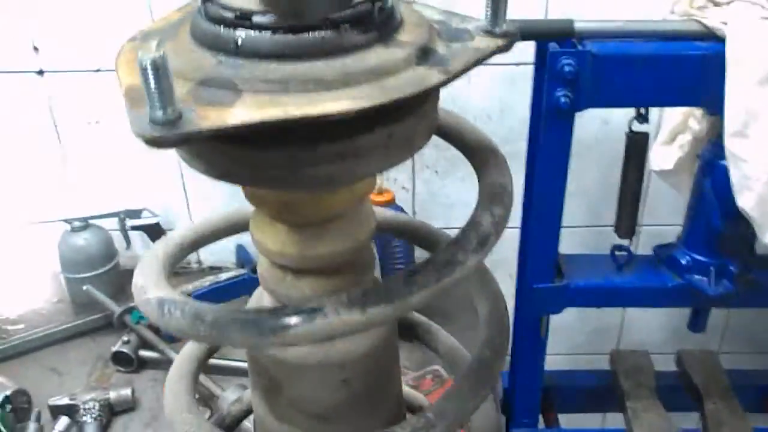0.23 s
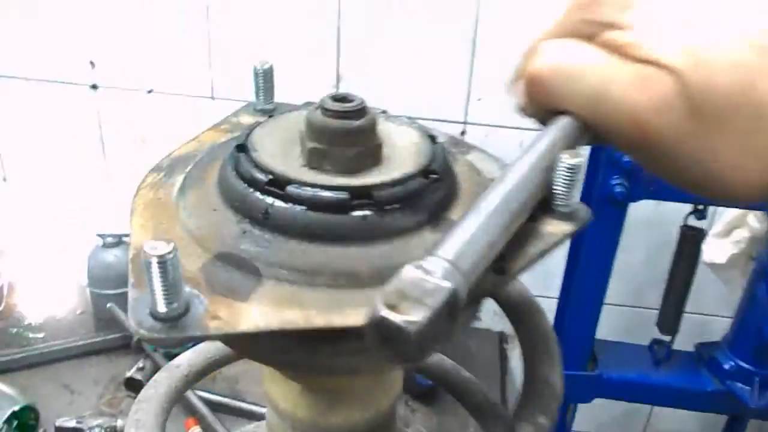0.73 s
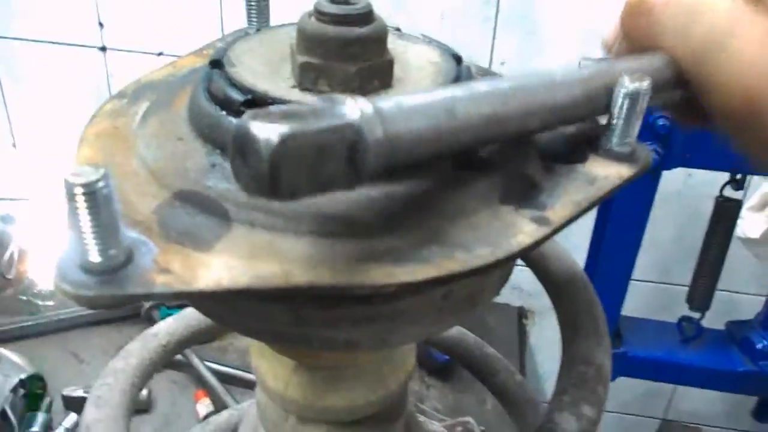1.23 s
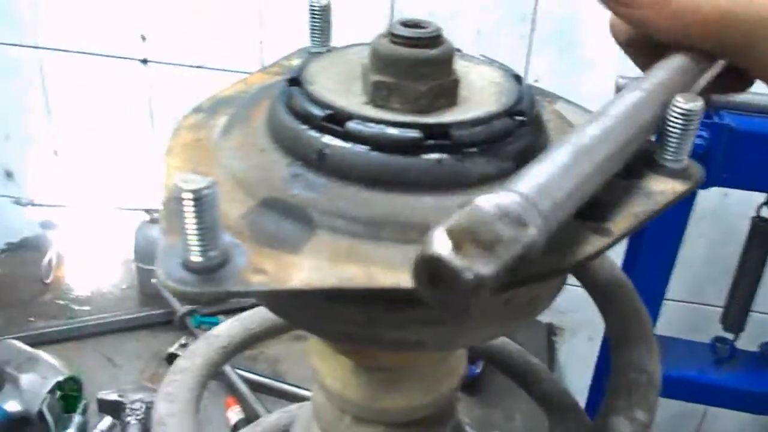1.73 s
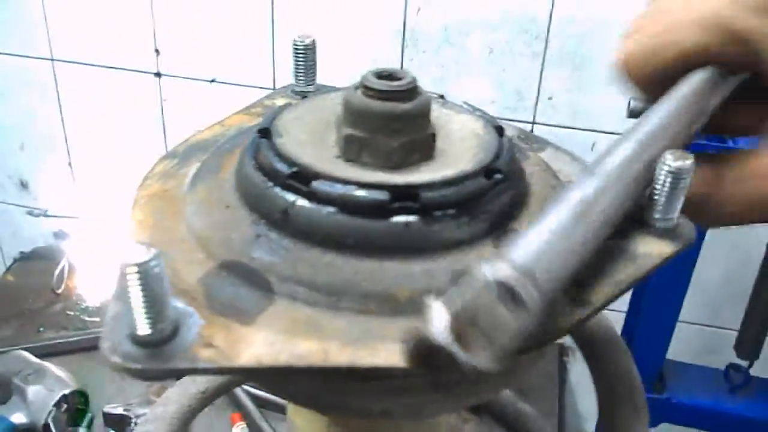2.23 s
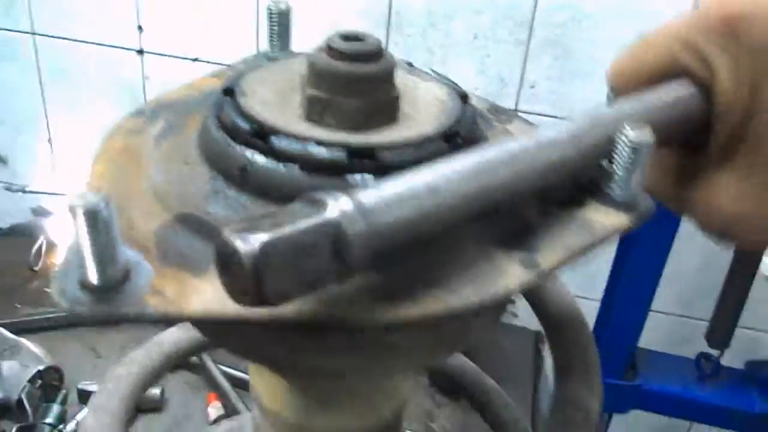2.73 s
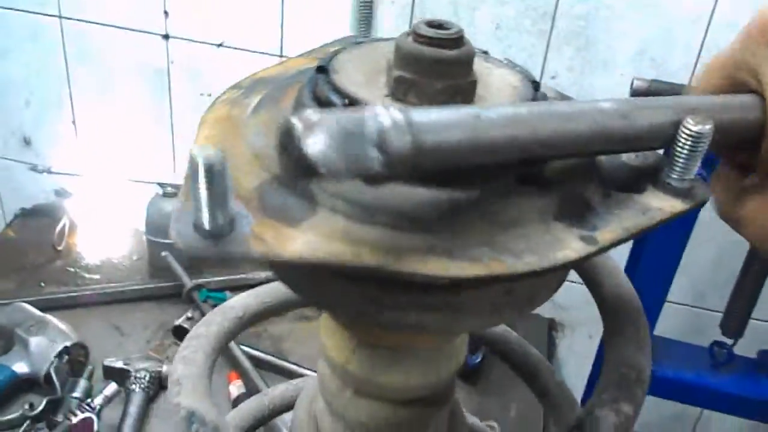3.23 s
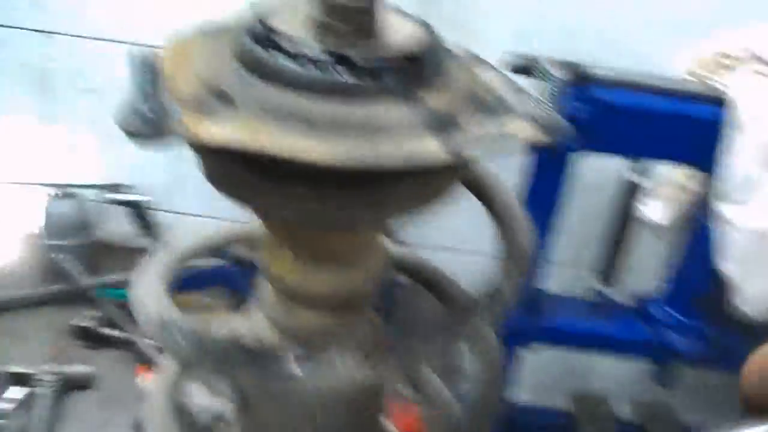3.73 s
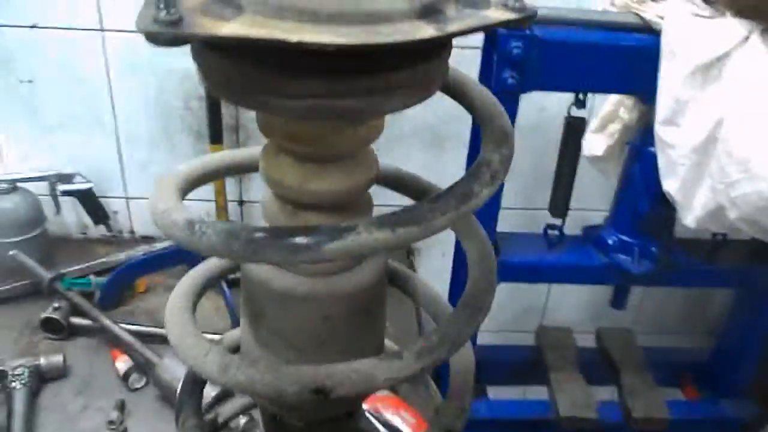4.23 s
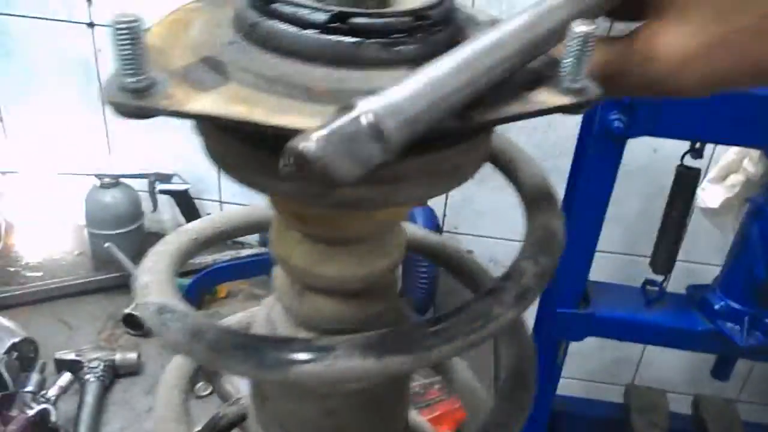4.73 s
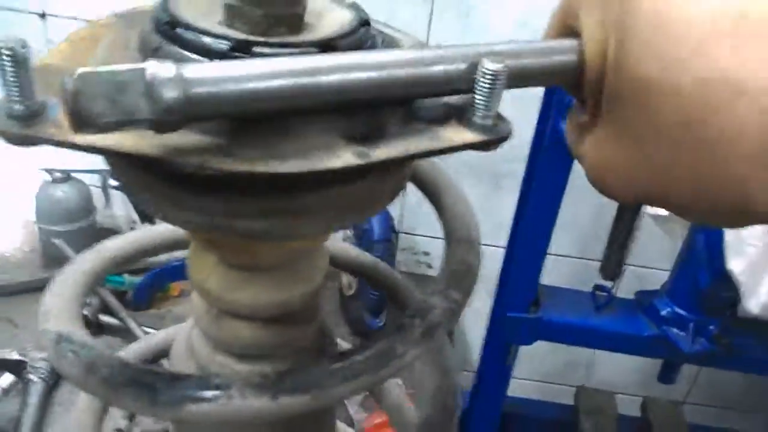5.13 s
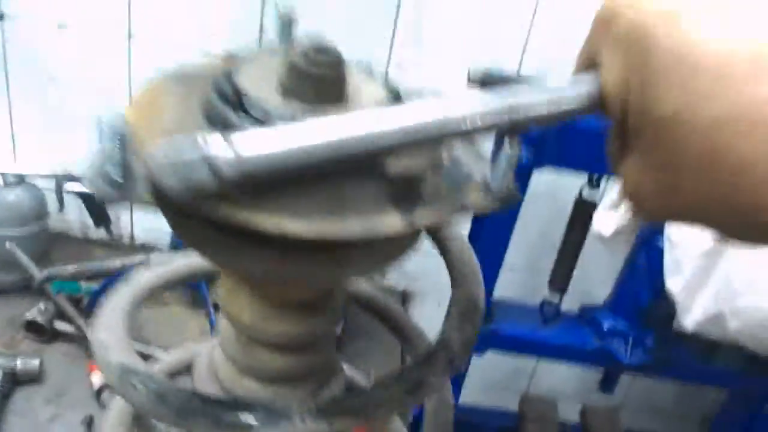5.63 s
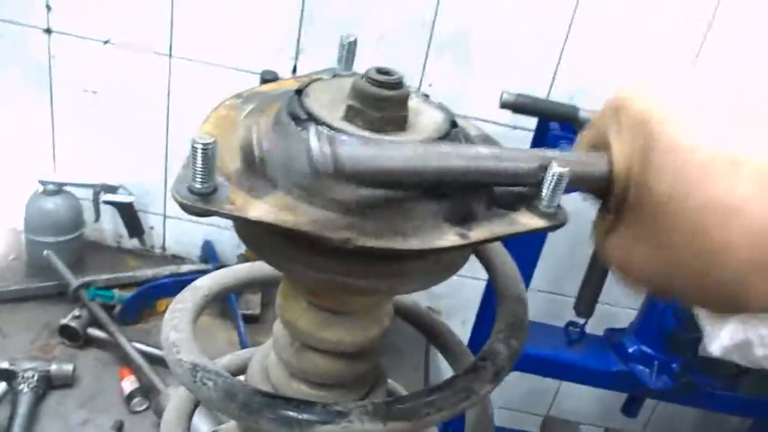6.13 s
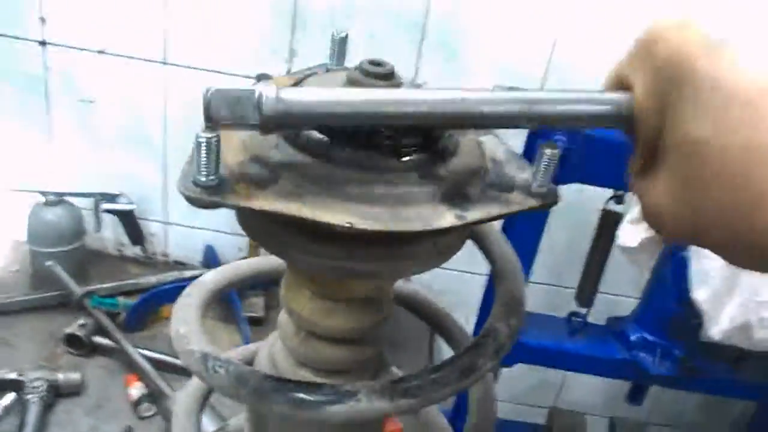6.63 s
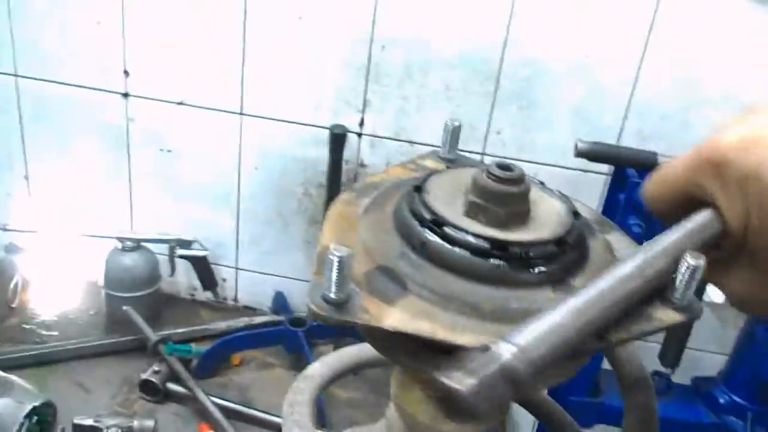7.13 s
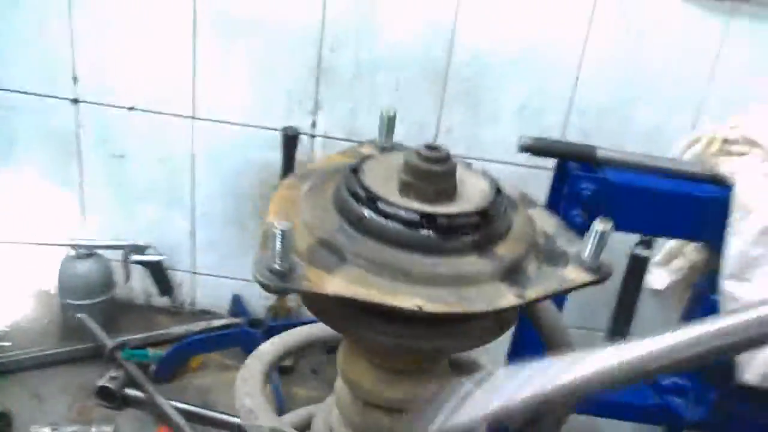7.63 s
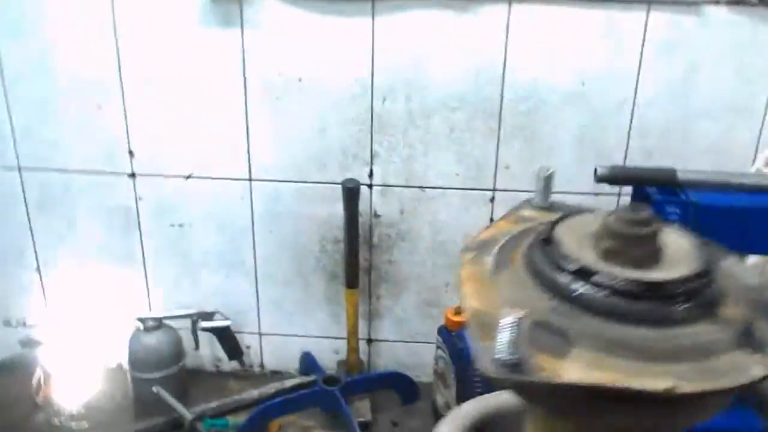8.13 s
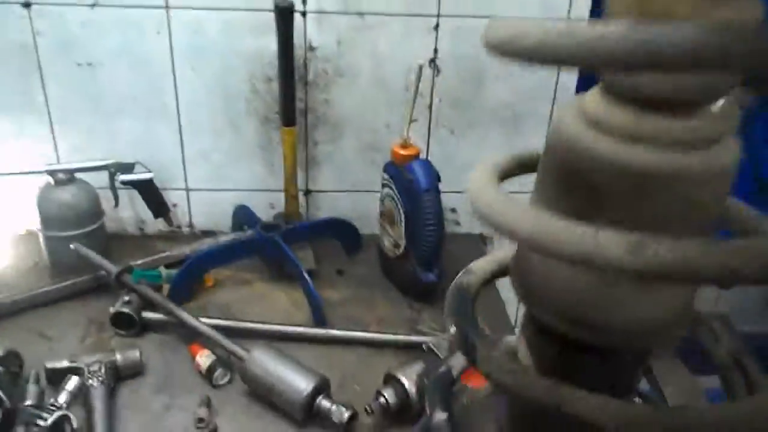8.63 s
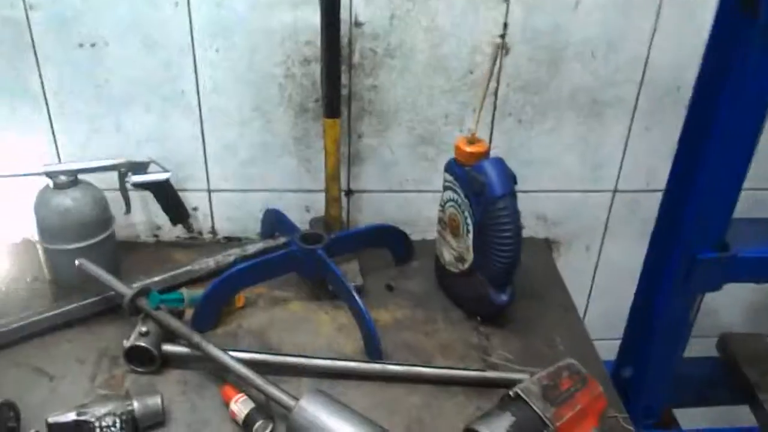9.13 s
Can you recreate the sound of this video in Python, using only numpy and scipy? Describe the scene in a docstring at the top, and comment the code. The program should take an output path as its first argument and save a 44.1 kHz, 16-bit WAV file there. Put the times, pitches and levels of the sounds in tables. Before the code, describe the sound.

Faint hiss, light rubbing and low bench rumble open the scene, close to a band-limited phone microphone in a tiled workshop. At 0.55 s a hard bright steel crack lands, followed by small ticks and dry scraping. Sparse clicks around 1.5-1.8 s are softer; a tight cluster snaps at 2.3-2.55, with another crack at 2.76. At 3.3 a rapid slowing chatter of thread clicks runs into loud cracks at 3.6-3.8 and a harsh rubbing swell with hollow ringing near 3.9. After a lull, cracks and duller clunks return irregularly from 4.5 to 5.8, then again at 6.65-7.15, with creaky rubs between. A dense clipped burst at 7.5-7.6 brings a second ringing swell, fading by 8.3. Soft knocks at 8.7-8.8 precede sharp knocks at 9.16 and 9.35-9.4, with scraping and a small tool's thin high ping.

```python
"""Low bench rumble, hiss and rubbing steel, then sharp clicks: a steel bar wedged between the studs of a
strut mount twists it to and fro in a tiled workshop. Clicks are noise bursts through resonances, the walls
decaying noise; rubs, swelling tails and bench are patchy noise through modes; a small tool rings as a sine.
One narrow-band phone microphone ducks after loud moments and clips."""
import sys
import numpy as np
from scipy import signal
from scipy.fft import rfft, irfft, next_fast_len
from scipy.io import wavfile
from scipy.ndimage import uniform_filter1d, map_coordinates

SR = 44100
rng = np.random.default_rng(int(sys.argv[2]) if len(sys.argv) > 2 else 0)


def pcm_store(signal):
    """Save signal as 16-bit PCM."""
    levels = np.round(np.clip(np.atleast_2d(signal), -1, 1) * 32767)
    wavfile.write(sys.argv[1], SR, levels.astype(np.int16).T)


N = 414540
STEP = 64  # samples between control values

# steel contacts: start_s, level_db, centre_hz, plate_db (levels before the trims in clicks())
CONTACTS = [(0.552, 2.5, 6250, -18), (0.592, -8, 5930, -11.5), (0.614, -13.5, 5620, -11.5),
            (0.7564, -27, 6550, -1.5), (1.0012, -20.5, 5220, -15), (1.518, -24.5, 4600, -12),
            (1.5355, -7, 5690, -20), (1.6487, -17.5, 6400, -27.5), (1.736, -23.5, 4600, -20.5),
            (1.7505, -18.5, 6170, -25.5), (1.769, -20.5, 5560, -19), (2.304, -24, 6240, -26),
            (2.318, -27, 6450, -25.5), (2.351, -23.5, 5000, -24), (2.368, -24.5, 5470, -24.5),
            (2.388, -1.5, 6050, -12.5), (2.487, -10, 6120, -6), (2.504, -2.5, 5620, -25),
            (2.5143, 1, 6100, -37), (2.523, -8, 6260, -30.5), (2.5558, -14, 6100, -9),
            (2.7572, -0.5, 5500, -12), (2.8779, -12.5, 5120, -18.5), (2.939, -26, 5870, -20.5),
            (2.994, -28.5, 5950, -21), (3.58, 2, 4600, -22.5), (3.6057, 0, 6020, -31.5),
            (3.6125, -1, 6520, -19), (3.6202, 6.5, 6200, -16), (3.6275, -3, 5610, -12),
            (3.6289, 3, 6240, -10), (3.678, -1.5, 6380, -25.5), (3.681, -0.5, 6240, -26),
            (3.688, 4, 4170, -12), (3.7148, 1.5, 7000, -13), (3.751, 0.5, 2600, -28), (3.824, 0, 2680, -15),
            (4.5139, 1.5, 4330, -17.5), (4.545, -16.5, 6220, -26.5), (4.7635, 3.5, 6480, -28.5),
            (4.882, -17, 6140, -23.5), (4.9085, -6.5, 4150, -20), (4.9873, -8.5, 6240, -25),
            (4.996, -7.5, 6300, -21.5), (5.012, 2, 5520, -26), (5.1036, 2, 4520, -14),
            (5.432, -22, 5950, -30), (5.471, -23.5, 6250, -32), (5.502, -17.5, 6300, -28.5),
            (5.539, -10.5, 6220, -25.5), (5.5448, 1.5, 6310, -18), (5.558, 0.5, 4100, -17),
            (5.7193, -9.5, 6400, -38.5), (5.8136, -7.5, 4280, -19), (5.878, -23, 6250, -32),
            (6.011, -31, 6260, -30), (6.056, -27.5, 6400, -27.5), (6.096, -2, 5680, -35.5),
            (6.432, -16.5, 6040, -48), (6.6473, -16.5, 6370, -17.5), (6.7293, 3.5, 6490, -20),
            (6.7854, -12.5, 6300, -31), (6.8028, 1, 6680, -29.5), (6.735, -10, 6140, -21),
            (6.9023, -2, 2920, -10), (6.912, -5.5, 6040, -18), (6.9253, 1.5, 6650, -13),
            (7.1476, 2, 5470, -15), (7.2972, -17, 6160, -30.5), (7.33, -7.5, 5500, -24),
            (7.349, -9.5, 5500, -26), (7.3371, 5, 3260, -26.5), (7.435, -17.5, 6600, -32.5),
            (7.492, -1.5, 6170, -30.5), (7.4966, 1.5, 6100, -37.5), (7.506, -7, 6280, -38.5),
            (7.5222, 2.5, 5380, -20), (7.5395, 2, 6040, -23), (7.546, 1, 5680, -17.5),
            (7.5519, 1.5, 5940, -28.5), (7.5605, 4.5, 6740, -34), (7.5624, 4, 5800, -23),
            (7.568, 5, 6590, -32), (7.6129, 5, 5460, -18), (8.6738, -11, 3610, -12),
            (8.709, -28, 5600, -20.5), (9.1555, 0.5, 3820, -7), (9.35, 1, 6600, -13),
            (9.3902, 6, 3620, -11)]
# modes of the steel bar: centre_hz, width_hz, level_db
BAR_MODES = [(6260, 143, -4), (5560, 100, -11.5), (4090, 200, -16), (6400, 195, -3)]


def amp(db):
    """Decibels to amplitude."""
    return 10 ** (np.asarray(db) / 20)


def unit(x):
    """Scale to an RMS of one."""
    return x / np.sqrt(np.mean(x ** 2) + 1e-20)


def along(points, hz):
    """Interpolate (Hz, value) points on a log frequency axis."""
    f, v = np.transpose(points)
    return np.interp(np.log(hz + 1), np.log(f + 1), v)


def wobble(knots_per_s):
    """Smooth random curve."""
    knots = rng.standard_normal(int(N * knots_per_s / SR) + 4)
    return map_coordinates(knots, [np.arange(N) * knots_per_s / SR])


def filtered(x, response):
    """Multiply the spectrum of x by a response of frequency."""
    m = next_fast_len(len(x) + 4096)
    return irfft(rfft(x, m) * response(np.fft.rfftfreq(m, 1 / SR)), m)[:len(x)]


def modes(table):
    """Causal response of parallel resonances with alternating polarity."""
    def response(f):
        total = 0
        for k, (centre, width, db) in enumerate(table):
            damping = 1j * f * width
            total = total + (-1) ** k * amp(db) * damping / (centre * centre - f * f + damping)
        return total
    return response


def coloured(x, spectrum):
    """Shape x by a (Hz, dB) curve, at unit RMS."""
    return unit(filtered(x, lambda hz: amp(along(spectrum, hz))))


def patchy(depth_db):
    """Noise whose gain varies in narrow patches over time and frequency."""
    z = signal.stft(rng.standard_normal(N), nperseg=1024)[2]
    over_hz = uniform_filter1d(rng.standard_normal(z.shape), 3, 0)
    field = unit(uniform_filter1d(over_hz, 7, 1))
    return unit(signal.istft(z * amp(depth_db * field), nperseg=1024)[1][:N])


def swell(peak_s, rise_s, fall_s, db):
    """Control gain straight in dB: rise_s and fall_s per 20 dB, at least 12 and 25 ms."""
    t = np.arange(0, N + STEP, STEP) / SR - peak_s
    return amp(db - 20 * np.where(t < 0, -t / max(rise_s, .012), t / max(fall_s, .025)))


def per_sample(control):
    """Interpolate control values to every sample."""
    return np.interp(np.arange(N) / STEP, np.arange(len(control)), control)


def air():
    """Workshop air and microphone hiss: patchy coloured noise."""
    # hiss spectrum: freq_hz, level_db
    hiss = [(24, -7), (40, -8.5), (200, -0.5), (1120, -7.5), (1310, -8), (1430, -10), (2000, -15.5),
            (7300, -20), (7960, -10), (10200, -43), (17300, -120)]
    return amp(-48) * coloured(patchy(3.5), hiss)


def rubbing():
    """Steel rubs on steel and, after the loudest clicks, a noisy tail swells; bar, plate and bench join in."""
    # rubs and swells: peak_s, rise_s, fall_s, rub_db, bar_db over rub, plate_db over rub
    strokes = [(0.38, 0.6, 1, -46.5, -4.5, -6), (0.599, 0.08, 0.23, -32.5, 3, -2),
               (0.92, 0.5, 1.7, -45, -9.5, -6.5), (1.4, 0, 1, -48, -8.5, -9.5),
               (1.55, 0.18, 0.4, -41.5, -9.5, -5.5), (1.651, 0, 0.05, -31.5, -4, -12),
               (1.769, 0.01, -0.03, -30, 0.5, -4.5), (1.82, 0.35, 1.2, -43, -6, -6),
               (2.229, 0.04, 0.6, -42, 4.5, -12), (2.529, 0.08, 0.05, -28.5, -4, -7.5),
               (2.77, 0.1, 0.37, -47, -4.5, 0.5), (2.9, 1, 0.2, -42, -7, -8),
               (3.13, 0, 0.5, -42.5, -12, -3.5), (3.18, 0.17, 0.3, -35.5, -10, -1),
               (3.342, 0.06, 0.5, -27.5, -12.5, -12), (3.46, 0.13, 0.31, -23.5, -11.5, -3.5),
               (3.586, 0.18, -0.03, -24, -8, -2.5), (3.879, 0.1863, 0.25, -12.5, -17, -5.5),
               (4.38, -2.3, 0.5, -39, -10, -6.5), (4.532, -0.17, 0.06, -24.5, -5, -8),
               (4.74, 0.97, 0.5, -41, 5.5, -2), (4.79, -0.47, 0.13, -43.5, 14.5, -11.5),
               (4.887, 0.04, 0.21, -28.5, 11, -3), (4.995, 0, 0, -32.5, 12.5, -6),
               (5.03, -0.6, 0.22, -38, -2.5, -8.5), (5.128, 0.7, 0.38, -35.5, -11, 1),
               (5.569, 0.2, 0.1, -32, -3.5, -12.5), (5.74, 0.3, 0.24, -35, -3, -2.5),
               (5.849, 0.56, 0.05, -33, -8, -16), (6.14, -0.14, 0.5, -39, -1, -5),
               (6.5, 6, 1, -48.5, -5.5, -4.5), (6.544, 0.03, 0.14, -34, -4, -8.5),
               (6.76, -0.44, 0.03, -38, 9, -12.5), (6.812, 0.03, 0, -23.5, 5.5, -6.5),
               (6.919, 0.21, -0.03, -22, -10.5, -8), (7.008, 0.17, 0.5, -31.5, 0, -6),
               (7.315, 0.3, 0.06, -26.5, -5, -15.5), (7.37, 0.62, 1.05, -37.5, -8.5, 3),
               (7.56, 0.09, -0.0144, -16, -1.5, -5.5), (7.739, 0.29, 0.276, -16.5, -15, -7.5),
               (8.449, -0.1, 0.1, -40, -7.5, -2), (8.699, 0.5, -5.2, -38.5, -9.5, -5),
               (8.831, 0.3, 0.35, -33, -10, -3), (9.149, -0.2, -0.5, -38, -18.5, -1.5),
               (9.171, 0.11, 2.8, -27, -16, 3.5), (9.4, 0.1, 1, -30.5, -16, 2)]
    # rubbing spectrum: freq_hz, level_db
    rub_spectrum = [(1760, -28), (3000, -14), (4120, -3), (4770, -2.5), (5760, -1), (7050, -2.5),
                    (7500, -5), (7960, -11.5), (10200, -35), (17300, -120)]
    # plate: centre_hz, width_hz, level_db
    rub_plate_modes = [(1750, 150, 0.5), (3230, 1020, 4), (2030, 970, 1.5), (1220, 1400, -6.5)]
    # bench: centre_hz, width_hz, level_db
    bench_modes = [(99.7, 41, -3.5), (191, 58, 1), (338.5, 89, -6.5), (64.6, 2.3, -14.5), (455, 690, -11),
                   (748, 6.1, -2)]
    # weighting of the bench modes: freq_hz, level_db
    rumble_spectrum = [(20, -27.5), (60, 3.5), (100, -1), (1500, -1.7)]
    # slow level of the bench rumble: time_s, level_db
    bench_load = [(0, -4.5), (0.35, -8), (0.7, -0.5), (1.4, -0.5), (1.65, -4), (2.2, -10), (2.45, -2.5),
                  (2.9, 1.5), (3.25, -3.5), (3.42, 3), (3.6, 0), (3.75, -7.5), (4, -1.5), (4.4, -3),
                  (4.6, 1.5), (5.5, 1.5), (5.75, 0), (6.2, -1.5), (6.85, -0.5), (7.05, -2), (7.35, 4),
                  (7.6, -9.5), (8.05, -4), (8.6, -6), (9.1, -9), (9.4, -7.5)]

    power = np.array([swell(*row[:4]) ** 2 for row in strokes])
    shares = amp([(0, bar_db, plate_db) for *_, bar_db, plate_db in strokes]) ** 2
    rub_gain, bar_gain, plate_gain = map(per_sample, np.sqrt(shares.T @ power))

    drive = np.hypot(rub_gain, plate_gain)
    rest_db, driven_db, growth = -54, -41.5, 0.69  # driven: at a drive of -40 dB; growth: dB per dB
    bench_gain = np.hypot(amp(rest_db), amp(driven_db) * (drive / amp(-40)) ** growth)
    load_db = np.interp(np.arange(N) / SR, *np.transpose(bench_load))
    bench_gain *= amp(load_db + 1.27 * wobble(5) + 2.8 * wobble(14))

    flicker = amp(1.4 * wobble(180) + wobble(30))
    rub = rub_gain * coloured(flicker * patchy(3), rub_spectrum)
    bar = bar_gain * unit(filtered(flicker * patchy(1.1), modes(BAR_MODES)))
    plate = plate_gain * unit(filtered(flicker * patchy(3.5), modes(rub_plate_modes)))
    bench = bench_gain * coloured(filtered(patchy(2), modes(bench_modes)), rumble_spectrum)
    return rub + bar + plate + bench


def clicks():
    """Each contact fades in faintly, cracks and crackles out: broad crack, bright centre, plate, bar ring."""
    # mount plate: centre_hz, width_hz, level_db
    plate_modes = [(1530, 470, 9), (1866, 130, 14.5), (3100, 1350, 5), (396, 290, 3.5)]
    crackle_t60_s, broad_db, ring_db = 0.053, -9.5, 8.5
    bar_hz = 6230
    lead = SR // 50
    out, t = np.zeros(N + SR), np.arange(-lead, SR // 8) / SR
    after = np.maximum(t, 0)
    rows = [(*row, crackle_t60_s, broad_db, ring_db) for row in CONTACTS] + chatter()
    for s, db, hz, plate_db, t60, crack_db, bar_db in rows:
        lead_in = amp(-27 + 60 * t / .03) * (t < 0)
        decay = amp(-60 * after / 0.0064) + amp(-11 - 60 * after / t60)
        attack = 1 - np.exp(-after / 0.00039)
        crackle = rng.standard_normal(len(t)) * (lead_in + decay * attack)
        crackle[lead + 8] += amp(12)  # first touch

        centre = modes([(hz, 1300, 0)])
        dull_db = 12 * max(np.log(bar_hz / hz), 0)  # lower centres crack more broadly
        broad = modes([(5440, 3150, crack_db + dull_db)])
        ring = amp(bar_db - 16 * abs(np.log(hz / bar_hz)))  # off-centre blows miss the bar's main mode
        bright = filtered(crackle, lambda f: centre(f) ** 2 + broad(f) + ring * modes(BAR_MODES)(f))
        plate = filtered(crackle, modes(plate_modes))
        sound = bright / np.abs(bright).max() + amp(plate_db + 4.5) * plate / np.abs(plate).max()
        out[round(s * SR) - lead:][:len(t)] += amp(db - 0.29) * sound
    return out[:N]


def walls(x):
    """Tiled walls answer with decaying noise; each frequency dies at its own speed."""
    # decay: freq_hz, t60_s
    wall_decay = [(300, 0.049), (2000, 0.068), (8000, 0.016)]
    hz, t, z = signal.stft(rng.standard_normal(SR // 2), SR, nperseg=256)
    decay = amp(-60 * t / along(wall_decay, hz)[:, None])
    tail = signal.istft(z * decay, SR, nperseg=256)[1]
    delayed = np.pad(x, (200, 0))  # samples
    return signal.fftconvolve(delayed, tail / np.linalg.norm(tail))[:N]


def rattle():
    """After some blows the studs rasp and the cup sounds hollow: decaying noise through their modes."""
    # lingering blows: start_s, t60_s, studs_db, cup_db
    linger = [(2.758, 0.84, -51.5, -28.5), (4.516, 0.74, -25.5, -51.5), (5.106, .7, -49, -27.5)]
    # studs: centre_hz, width_hz, level_db
    stud_modes = [(4090, 56, 1), (4650, 110, 1.5), (5050, 160, -4.5), (6300, 150, -1)]
    # hollow under the mount's cup: centre_hz, width_hz, level_db
    cup_modes = [(1690, 150, -2), (3100, 390, 0), (5330, 130, -3), (5970, 80, -3)]
    out, t = np.zeros(N + SR), np.arange(SR // 2) / SR
    for s, t60, studs_db, cup_db in linger:
        for table, db in (stud_modes, studs_db), (cup_modes, cup_db):
            rasp = unit(filtered(rng.standard_normal(len(t)), modes(table)))
            out[round(s * SR):][:len(t)] += amp(db - 60 * t / t60) * rasp
    return out[:N]


def chatter():
    """Click rows as the bar skips down a stud's thread, fast and then slowing."""
    # skips: skip_number, wait_ms to the next, centre_hz
    skips = [(0, 16, 7300), (2, 11.9, 6800), (7, 12.1, 6700), (12, 34.2, 6900)]
    start_s, level_db, plate_db, t60_s = 3.3189, -1.5, -18.5, 0.039
    broad_db, broadens_db, ring_db = -19.5, 0.5, 4  # broadens_db: per skip away from the middle
    skip, ms, hz = np.transpose(skips)
    waits = np.exp(np.interp(np.arange(13), skip, np.log(ms))) / 1000
    rows = []
    for k, s in enumerate(start_s + np.r_[0, np.cumsum(waits)]):
        crack_db = broad_db + broadens_db * abs(k - len(waits) / 2)
        db = level_db + rng.normal(0, 1)
        rows.append((s, db, np.interp(k, skip, hz), plate_db, t60_s, crack_db, ring_db))
    return rows


def ringing():
    """A ringing swells and sinks twice: patchy noise through resonances."""
    # ringing swells: peak_s, level_db
    swells = [(3.896, -16.5), (7.76, -20)]
    # resonances: centre_hz, width_hz, level_db
    ringing_modes = [(2610, 64, 4.5), (2433, 65, 0.5), (1720, 170, -8.5), (4160, 160, -3), (741, 49, -6.5),
                     (5600, 260, -7.5)]
    rise_s, fall_s = 0.23, 0.32  # per 20 dB
    gain = per_sample(sum(swell(s, rise_s, fall_s, db) for s, db in swells))
    return gain * unit(filtered(patchy(1.9), modes(ringing_modes)))


def aftersound():
    """Dull blows land on the mount, which rings on around their centre as decaying noise."""
    dull_hz, width_hz, under_db, t60_s = 4380, 350, -35.5, 0.39
    out, t = np.zeros(N + SR), np.arange(SR // 2) / SR
    for s, db, hz, _ in CONTACTS:
        if hz < dull_hz:
            body = modes([(hz, width_hz, 0)])
            ring = unit(filtered(rng.standard_normal(len(t)), lambda f: body(f) ** 2))
            out[round(s * SR):][:len(t)] += amp(db + under_db - 60 * t / t60_s) * ring
    return out[:N]


def low_and_soft():
    """Low and soft noise through resonances: thuds, the low hum of the swells, the body of a knock."""
    # low and soft sounds: start_s, level_db, centre_hz, width_hz (of each of two passes), t60_s
    soft_sounds = [(3.83, -24.5, 185, 45, 0.98), (4.37, -27, 350, 400, 0.085), (6.4, -28.5, 183, 283, 0.2),
                   (6.68, -31.5, 1200, 1800, .24), (7.7, -28, 209, 45.3, 0.83),
                   (8.799, -24.5, 1460, 1700, 0.2), (8.826, -25, 764, 1310, 0.23),
                   (9.156, -28, 496, 900, 1.9), (9.158, -37, 152, 70, 1.4)]
    out, t = np.zeros(N + SR), np.arange(SR // 2) / SR
    attack = 1 - np.exp(-t / 0.0094)
    for s, db, hz, width, t60 in soft_sounds:
        body = modes([(hz, width, 0)])
        puff = unit(filtered(rng.standard_normal(len(t)), lambda f: body(f) ** 2))
        out[round(s * SR):][:len(t)] += amp(db - 60 * t / t60) * attack * puff
    return out[:N]


def nudge():
    """A soft push on the strut's hollow housing: a short puff of noise in its modes."""
    # housing: centre_hz, width_hz, level_db
    housing_modes = [(315, 22, -4.5), (745, 35, 3.5), (1255, 71, -1.5), (2850, 350, -10.5),
                     (4050, 130, -12)]
    start_s, level_db, t60_s = 6.541, -29, 0.31
    after = np.maximum(np.arange(N) / SR - start_s, 0)
    envelope = amp(level_db - 60 * after / t60_s) * (1 - np.exp(-after / 0.0067))
    return envelope * unit(filtered(rng.standard_normal(N), modes(housing_modes)))


def tool():
    """A small tool rings when knocked: one decaying sine mode, slightly unsteady in strength."""
    # knocks: start_s, level_db, pitch_hz, t60_s
    knocks = [(9.158, -21.5, 5068, 1.0), (9.353, -26, 5068, 1.6)]
    t = np.arange(N) / SR
    ring = np.zeros(N)
    for s, db, hz, t60 in knocks:
        ring += (t > s) * amp(db - 60 * np.abs(t - s) / t60) * np.sin(2 * np.pi * hz * t)
    return ring * amp(2.5 * wobble(55))


def scene():
    """Sum all sources; the walls answer the clicks only."""
    steel = clicks()
    mono = air() + rubbing() + steel + amp(-14) * walls(steel) + rattle()
    mono += ringing() + aftersound() + low_and_soft() + nudge() + tool()
    return np.array([mono, mono])


def record(dry):
    """Narrow-band notched microphone, gain ducking just after loud moments, then clipping."""
    mic_hz, top_hz = 8010, 15800  # clipping splatter reaches from mic_hz up to top_hz
    notch_hz, notch_width_hz, notch_depth = 7640, 116, 0.99  # a narrow band is missing near the top

    def microphone(hz):
        notch = notch_depth * np.exp(-((hz - notch_hz) / notch_width_hz) ** 2)
        return (hz < mic_hz) * (1 - notch)

    narrow = filtered(dry[0], microphone)
    t = np.arange(SR // 2) / SR
    memory = (1 - np.exp(-t / 0.025)) * np.exp(-t / 0.11)
    mean_power = np.abs(signal.fftconvolve(narrow ** 2, memory / memory.sum())[:N])
    knee_power = amp(-25.5)
    ducked = narrow / (1 + mean_power / knee_power) ** 0.34
    mono = filtered(np.clip(ducked, -1, 1), lambda hz: hz < top_hz)
    return np.array([mono, mono])


dry = scene()
out = record(dry)
pcm_store(out)
```